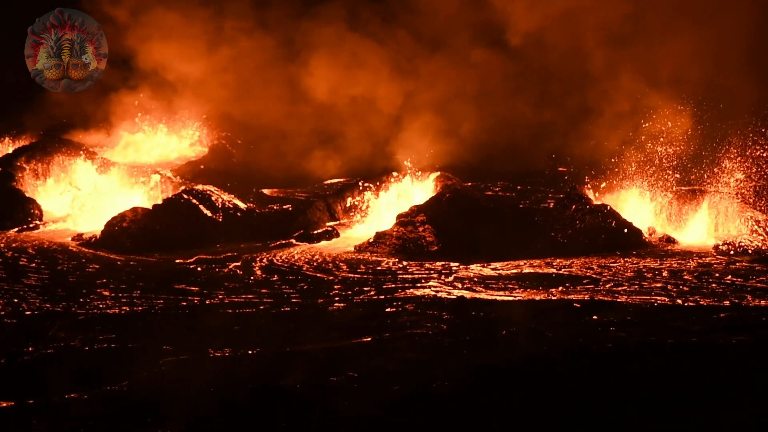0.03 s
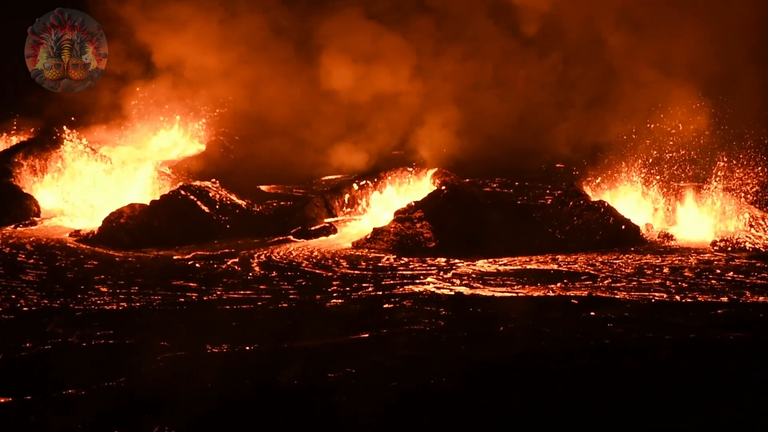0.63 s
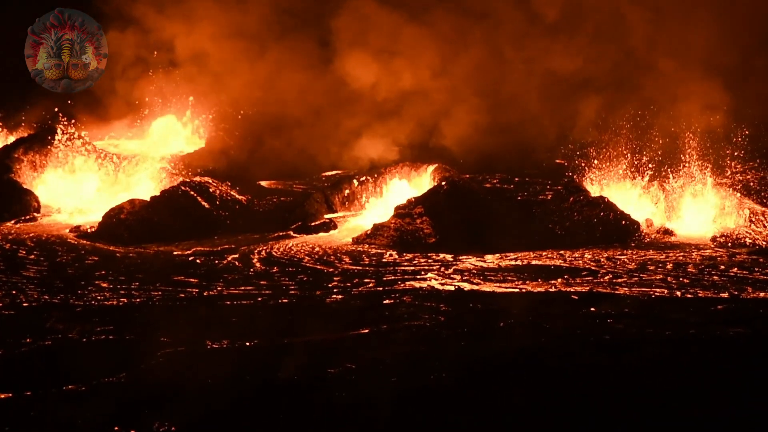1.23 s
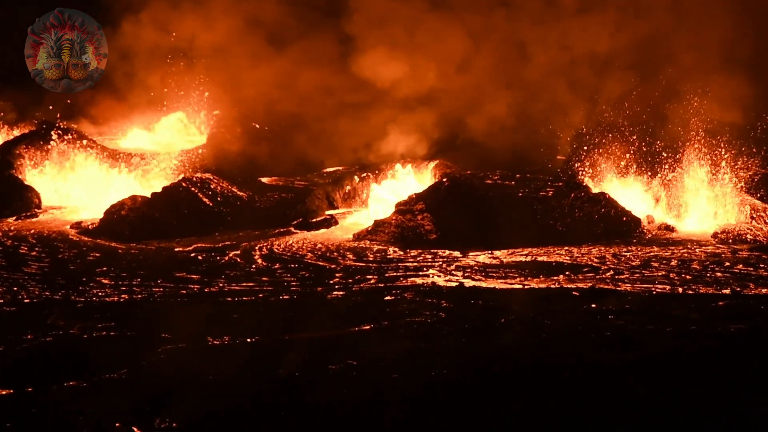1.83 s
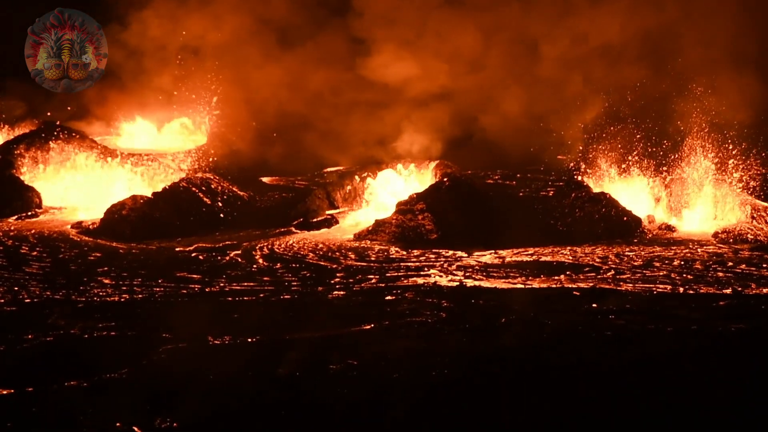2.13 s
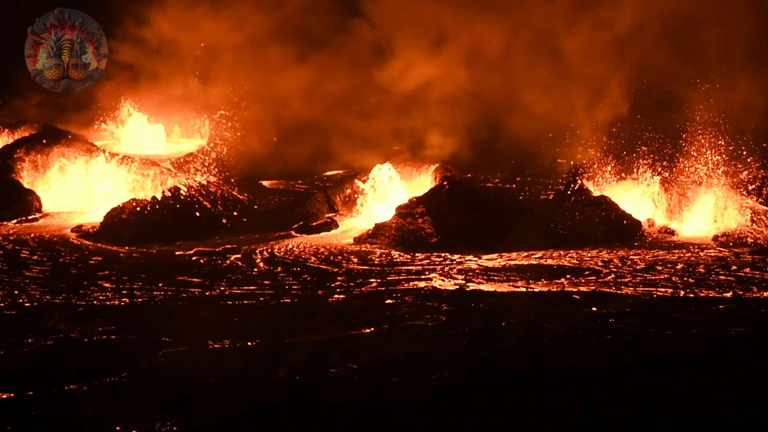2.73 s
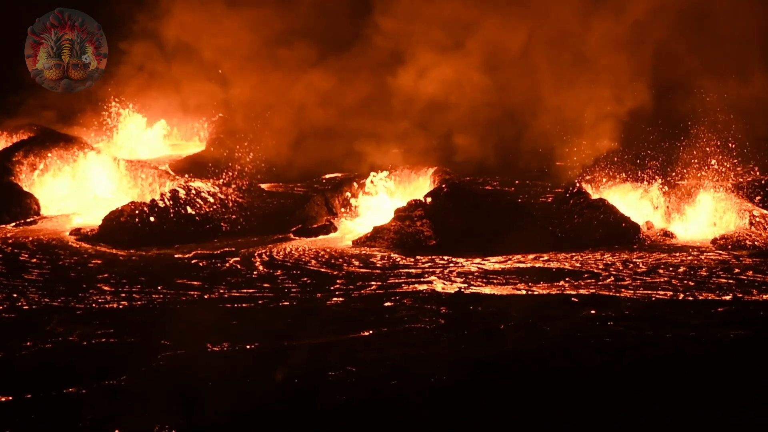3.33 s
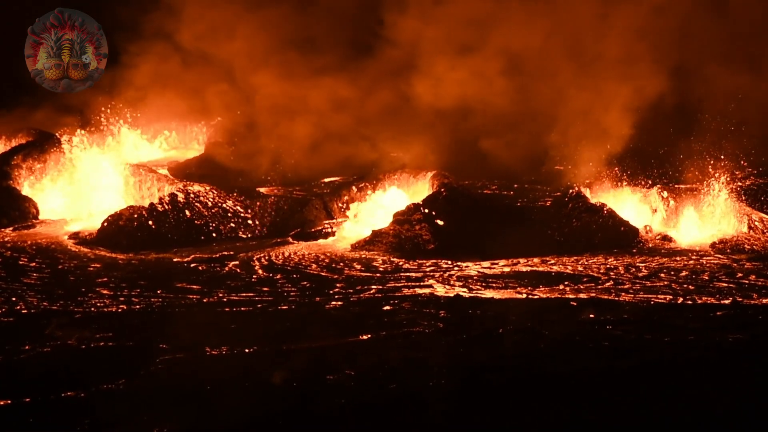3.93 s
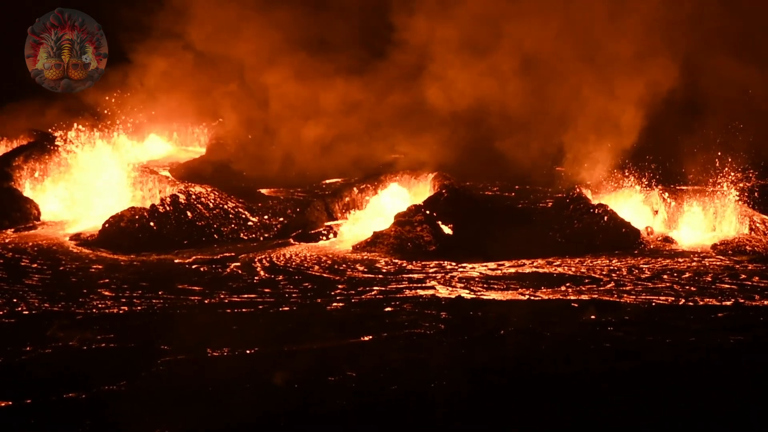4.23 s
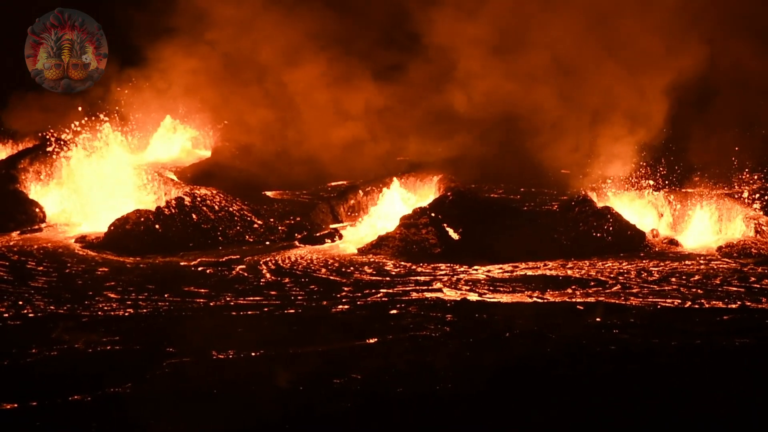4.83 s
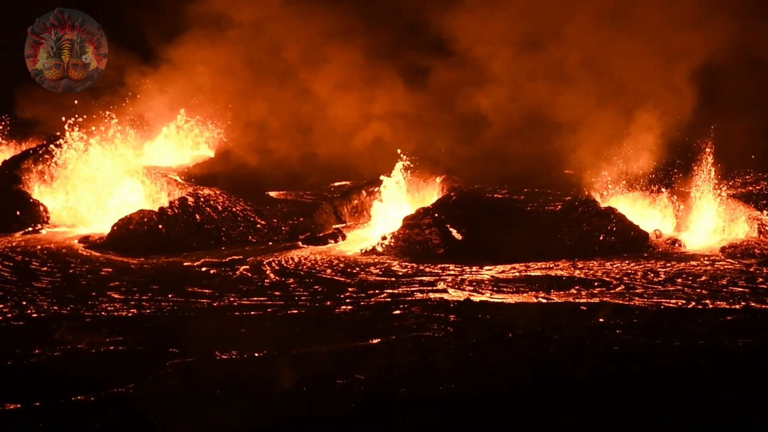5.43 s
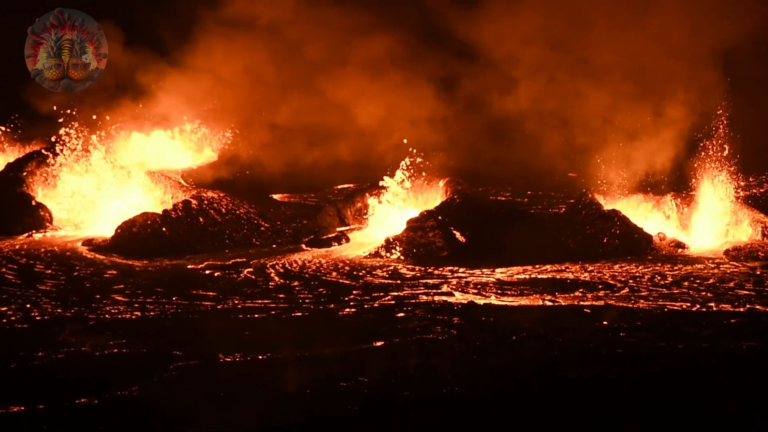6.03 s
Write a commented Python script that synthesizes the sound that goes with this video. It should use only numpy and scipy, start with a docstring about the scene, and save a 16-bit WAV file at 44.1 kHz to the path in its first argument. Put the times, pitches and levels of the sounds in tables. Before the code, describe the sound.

Three lava fountains roar far across an open lava lake for about six seconds. A deep rumble from the vents and light wind runs throughout, with molten rock churning and slapping back into the pools. Above it, gas rushes out in uneven surges, strongest around 1 to 1.6 seconds and again near 2.7 and 3.8, throwing spray that patters and fizzes faintly. Big bubbles give short, low booms, most clearly at the very start and near 1, 2.6 and 3.8 seconds, with weaker ones between and at 4.4. From about 0.5 to 1 second, one vent gives a thin, sharp hiss that cuts off. Short puffs of gas are scattered through, with deeper ones near 1.7, 5 and 5.8 seconds. A single faint dry tick comes just before 6 seconds while the rumble carries on.

```python
"""Three lava fountains roar far across a lava lake at night, in light wind.
Gas rushes out in surges and throws spray that patters on the crust. Big bubbles boom in the
vents over a deep rumble while molten rock churns and slaps back. Single mouths puff, one vent
hisses sharply for half a second, and a dry crackle comes near the end."""
import sys
import numpy as np
from scipy import signal
from scipy.fft import rfft, irfft, next_fast_len
from scipy.io import wavfile
from scipy.ndimage import uniform_filter1d, map_coordinates

SR = 44100
rng = np.random.default_rng(int(sys.argv[2]) if len(sys.argv) > 2 else 0)


def generate_wav(signal):
    """Clip the signal to [-1, 1] and save it as 16-bit WAV at the path in sys.argv[1]."""
    frames = np.transpose(np.atleast_2d(signal))
    scaled = np.clip(frames, -1, 1) * 32767
    pcm = np.round(scaled).astype(np.int16)
    wavfile.write(sys.argv[1], SR, pcm)


N = 272097

# roar, spray and puff spectrum: f/Hz, relative level/dB
ROAR_SPECTRUM = [(150, -3.5), (300, -3), (450, -8.5), (700, -16), (900, -21), (1400, -25), (2000, -29.5),
                 (2700, -36), (3800, -45.5), (5500, -51), (7300, -55.5), (8200, -60), (9200, -71),
                 (14000, -84.5)]
# escaping gas spectrum: f/Hz, relative level/dB
HISS_SPECTRUM = [(2000, 15.5), (3200, 1), (4300, -4), (7100, -8), (8200, -13), (9200, -24), (10700, -23),
                 (12400, -35.5), (16000, -44)]
# steady boil: t/s, rumble/dB, churn/dB, roar/dB, spray/dB, fizz/dB
BOIL_LEVELS = [(0.3, -32, -41.5, -48.5, -60.5, -72.5), (2.0, -30.5, -35.5, -46.5, -58, -72.5),
               (3.3, -30, -36.5, -45.5, -55.5, -72), (4.2, -34, -35, -49, -59.5, -69.5),
               (5.05, -33.5, -34, -48.5, -57, -68.5), (5.7, -29.5, -34, -48.5, -56.5, -68.5),
               (6.15, -26, -45.5, -47.5, -59, -69.5)]


def fountains():
    """Gas roars out in surges and throws pattering spray, whose finest drops fizz."""
    roar_db, spray_db, fizz_db = surge_levels_db()
    gas = turbulence(depth_db=2.0, patch_hz=125.3, patch_s=0.08)
    gas += 0.39 * impacts(rate_per_s=600, spread_db=3.5)
    drops = turbulence(depth_db=1.6, patch_hz=344, patch_s=0.08)
    drops += 0.44 * impacts(rate_per_s=2000, spread_db=5)
    mist = turbulence(depth_db=1.0, patch_hz=384, patch_s=0.076)
    roar = amp(roar_db) * from_vents(gas, ROAR_SPECTRUM, low_hz=324, high_hz=930)
    spray = amp(spray_db) * from_vents(drops, ROAR_SPECTRUM, low_hz=889, high_hz=3400)
    fizz = amp(fizz_db) * from_vents(mist, ROAR_SPECTRUM, low_hz=3150, high_hz=14000)
    return roar + spray + fizz


def surge_levels_db(flutter_db=0.57, flutter_per_s=16):
    """Surges lift roar, spray and fizz above the boil; uneven gas flow flutters all three."""
    # t/s, length/s, attack/s, roar/dB, spray/dB, fizz/dB
    surges = [(-0.03, 0.18, 0.07, -47, -53.5, -74), (0.288, 0.5, 0.59, -42.5, -49, -74),
              (0.676, 0.23, 0.14, -40.5, -48.5, -69), (0.897, 0.25, 0.049, -39, -52.5, -67),
              (1.154, 0.21, 0.081, -37.5, -47.5, -68), (1.366, 0.28, 0.099, -36, -45, -68.5),
              (1.72, 0.11, 0.074, -41.5, -56.5, -70.5), (2.093, 0.48, 0.18, -40, -52.5, -70),
              (2.626, 0.25, 0.068, -39.5, -50, -68.5), (2.91, 0.24, 0.055, -44, -54.5, -70.5),
              (3.395, 0.21, 0.014, -42, -55.5, -67.5), (3.595, 0.32, 0.26, -38.5, -52.7, -69),
              (3.865, 0.15, 0.11, -63, -55.5, -68), (4.208, 0.44, 0.1, -42.5, -58.5, -80),
              (4.603, 0.28, 0.1, -42.5, -52, -70), (4.953, 0.21, 0.027, -43, -56, -76),
              (5.314, 0.087, 0.11, -40.5, -55.5, -69), (5.394, 0.15, 0.035, -50, -59.5, -66.5),
              (5.814, 0.045, 0.052, -41, -62.5, -80), (5.948, 0.25, 0.071, -51.5, -58.5, -74)]
    swells = [swell(*row[:3], release_s=0.07) for row in surges]
    levels_db = power_sum_db(curves(BOIL_LEVELS)[2:], swells, [row[3:] for row in surges])
    flutter = map_coordinates(rng.standard_normal(256), [np.arange(N) / SR * flutter_per_s], mode="wrap")
    return levels_db + flutter_db * flutter


def booms():
    """Each big gas bubble swells and rings for a few cycles, sinking in pitch as it opens."""
    # t/s, relative level/dB, f at peak/Hz, rise/s
    bubbles = [(0.069, -15, 71.8, 0.052), (1.04, -14.5, 69.5, 0.038), (1.311, -21, 65, 0.043),
               (2.361, -19, 59, 0.032), (2.638, -14, 65.3, 0.039), (3.806, -13, 72.3, 0.031),
               (4.381, -19, 57.7, 0.065)]
    out, t = np.zeros(N + SR), np.arange(SR // 2) / SR
    for (start_s, db, hz, rise_s), phase in zip(bubbles, rng.random(len(bubbles))):
        envelope = (t / rise_s * np.exp(1 - t / rise_s)) ** 2
        cycles = np.cumsum(hz * np.exp(-1.2 * (t - rise_s))) / SR
        ring = np.sin(2 * np.pi * (cycles + phase))
        out[round(start_s * SR):][:len(t)] += amp(db - 3.5) * envelope * ring
    return out[:N]


def rumble_and_churn():
    """Vents and wind rumble; heavy clots of lava slap back into the churning pools."""
    # f/Hz, relative level/dB
    bass_spectrum = [(18, -22.5), (25, -9.5), (35, 1.5), (50, -0.5), (68, 3), (90, 1), (150, -6.5),
                     (190, -7.5), (250, -13.5), (400, -19.5), (700, -33)]
    rumble_db, churn_db = heave_levels_db()
    flow = turbulence(depth_db=-1.5, patch_hz=51.0, patch_s=0.25)
    rumble = steadied(from_vents(flow, bass_spectrum, low_hz=22, high_hz=114.6), window_s=0.07)
    slaps = turbulence(depth_db=2, patch_hz=74.5, patch_s=0.055)
    slaps += 0.57 * impacts(rate_per_s=220, spread_db=2.0)
    churn = steadied(from_vents(slaps, bass_spectrum, low_hz=121.2, high_hz=315), window_s=0.13)
    return amp(rumble_db) * rumble + amp(churn_db) * churn


def heave_levels_db():
    """Lava heaves in the vents, lifting rumble and churn above the boil."""
    # t/s, length/s, rumble/dB, churn/dB
    heaves = [(-0.06, 0.22, -27, -39), (0.65, 0.16, -29.5, -32.5), (0.85, 0.57, -28.5, -29.5),
              (1.5, 0.42, -32.5, -40), (2.127, 0.3, -29.5, -31.5), (2.338, 0.49, -28.5, -37.5),
              (2.645, 0.15, -26, -26), (2.86, 0.22, -36.5, -38.5), (3.518, 0.39, -30, -32),
              (3.935, 0.27, -27.5, -35.5), (4.243, 0.23, -25, -31), (4.603, 0.062, -23, -39.5),
              (4.815, 0.047, -28, -41), (4.96, 0.1, -48, -34), (5.136, 0.36, -35.5, -36.5),
              (5.675, 0.17, -28, -34), (6.0, 0.11, -41, -48)]
    swells = [swell(*row[:2], attack_s=0.058, release_s=0.075) for row in heaves]
    return power_sum_db(curves(BOIL_LEVELS)[:2], swells, [row[2:] for row in heaves])


def puffs():
    """A pocket of gas blows through a mouth in the lava, which lends it a broad pitch."""
    # t/s, peak rms level/dB, centre f/Hz, width/Hz, rise/s
    pockets = [(0.05, -55.5, 2090, 1110, 0.063), (0.412, -53.5, 1850, 300, 0.0079),
               (1.5, -42, 666, 248, 0.052), (1.745, -33.5, 350, 110, 0.019), (2.13, -43.5, 760, 220, 0.061),
               (2.95, -38.5, 540, 100, 0.023), (3.44, -47, 1060, 350, 0.063),
               (4.69, -54, 1870, 1100, 0.082), (4.979, -30.5, 220, 110, 0.014),
               (5.4, -59, 2680, 1600, 0.12), (5.837, -28, 165, 90, 0.018)]
    out = np.zeros((2, N))
    for start_s, db, centre_hz, width_hz, rise_s in pockets:
        age = np.maximum(np.arange(N) / SR - start_s, 0) / rise_s
        edge_ratio = np.exp(width_hz / centre_hz / 2)
        noise = rng.standard_normal((2, N))
        rush = from_vents(noise, ROAR_SPECTRUM, centre_hz / edge_ratio, centre_hz * edge_ratio)
        out += amp(db) * (age * np.exp(1 - age)) ** 2 * rush
    return out


def jet(crest_s=0.76, crest_db=-57, slope_db_per_s=28):
    """Gas forced through a narrow crack hisses: it crests, sags and is cut off."""
    hiss_db = crest_db - slope_db_per_s * np.abs(np.arange(N) / SR - crest_s)
    opening = swell(start_s=0.472, length_s=0.495, attack_s=0.08, release_s=0.03)
    gas = turbulence(depth_db=3.0, patch_hz=650, patch_s=0.0393)
    return opening * amp(hiss_db) * from_vents(gas, HISS_SPECTRUM, low_hz=2880, high_hz=14000)


def crackle():
    """A brief dry tick in the treble."""
    # t/s, relative level/dB
    ticks = [(5.951, -56.5)]
    envelope, t = np.zeros(N + SR), np.arange(SR // 10) / SR
    for start_s, db in ticks:
        envelope[round(start_s * SR):][:len(t)] += amp(db - 8) * t / 0.0066 * np.exp(1 - t / 0.0053)
    noise = rng.standard_normal((2, N))
    return envelope[:N] * from_vents(noise, HISS_SPECTRUM, low_hz=6000, high_hz=14200)


def turbulence(depth_db, patch_hz, patch_s):
    """Two noises whose strength drifts in patches of time and frequency."""
    hz, t, spectra = signal.stft(rng.standard_normal((2, N)), SR, nperseg=1024)
    field = rng.standard_normal(spectra.shape[1:])
    grid = np.meshgrid(hz / patch_hz, t / patch_s, indexing="ij")
    patches_db = depth_db * unit(map_coordinates(field, grid, mode="wrap", order=1))
    _, noise = signal.istft(spectra * amp(patches_db), SR, nperseg=1024)
    return unit(noise[:, :N])


def impacts(rate_per_s, spread_db):
    """Two streams of blows at random moments, most small, a few large."""
    hits = rng.random(N) < rate_per_s / SR
    return unit(hits * amp(spread_db * rng.standard_normal(N)) * rng.standard_normal((2, N)))


def from_vents(pair, spectrum, low_hz, high_hz, blur_hz=2900):
    """Band of vent noise at two microphone ports: alike in the bass only, left first; mid rms 1."""
    # f/Hz, lead of left port/s
    left_lead = [(100, 0.00016), (250, 0.0001), (450, 0.000061), (800, 0.00017), (1500, 0.00016),
                 (3000, 0.00017), (6000, .00011)]

    def spread(hz):
        angle = np.arccos(1 / (1 + (hz / blur_hz) ** 2)) / 2
        return colour(spectrum, hz) * band(hz, low_hz, high_hz) * np.array([np.cos(angle), np.sin(angle)])

    def arrival(hz):
        lead_s = np.interp(hz, *np.transpose(left_lead))
        return np.exp(1j * np.pi * lead_s * np.array([hz, -hz]))

    mid, side = filtered(pair, spread)
    ports = filtered(np.array([mid + side, mid - side]), arrival)
    return ports / np.sqrt(np.mean(ports.mean(0) ** 2))


def steadied(x, window_s):
    """Even out the chance swells of a deep noise."""
    power = uniform_filter1d(x.mean(0) ** 2, max(int(window_s * SR), 1))
    return x / np.sqrt(np.abs(power) + 0.07)


def swell(start_s, length_s, attack_s, release_s):
    """Sine rise, hold, exponential fall after length_s."""
    age_s = np.arange(N) / SR - start_s
    rise = np.sin(np.pi / 2 * np.clip(age_s / max(attack_s, 1e-3), 0, 1))
    return rise * np.exp(-np.maximum(age_s - length_s, 0) / max(release_s, 1e-3))


def power_sum_db(steady_db, swells, peaks_db):
    """Per layer: steady level plus all swells, summed in power."""
    return 10 * np.log10(amp(steady_db) ** 2 + (amp(peaks_db) ** 2).T @ np.square(swells))


def curves(rows):
    """Per-sample curve of each column after t/s."""
    times_s, *columns = np.transpose(rows)
    return [np.interp(np.arange(N) / SR, times_s, column) for column in columns]


def filtered(x, response):
    """Apply response(hz) by FFT."""
    size = next_fast_len(N + SR // 2)
    hz = np.fft.rfftfreq(size, 1 / SR) + 1e-3
    return irfft(rfft(x, size) * response(hz), size)[..., :N]


def colour(points, hz):
    """Gain through (f/Hz, level/dB) points on a log axis."""
    points_hz, db = np.transpose(points)
    return amp(np.interp(np.log(hz + 1), np.log(points_hz + 1), db))


def band(hz, low_hz, high_hz, order=5):
    """Smooth band-pass gain."""
    return ((1 + (low_hz / hz) ** (2 * order)) * (1 + (hz / high_hz) ** (2 * order))) ** -0.5


def amp(db):
    """Decibels to gain."""
    return 10 ** (np.asarray(db) / 20)


def unit(x):
    """Scale to rms 1."""
    return x / np.sqrt(np.mean(x ** 2) + 1e-20)


def right_port(hz):
    """The camera body shapes the right port: slight treble lift, a notch, a midrange bump."""
    shelf_db = 0.5 * hz ** 2 / (hz ** 2 + 2300 ** 2)
    notch_db = -5.5 / (1 + ((hz - 4650) / 380) ** 2)
    bump_db = 2.0 / (1 + ((hz - 780) / 230) ** 2)
    return amp(shelf_db + notch_db + bump_db)


def scene():
    """All sources at the two ports."""
    return rumble_and_churn() + booms() + fountains() + jet() + puffs() + crackle()


def record(dry):
    """Port colour, faint microphone self-noise, band limit."""
    # both: f/Hz, relative level/dB
    self_noise = [(100, -4), (7000, 4.5), (9200, -5.5), (10500, 1.5), (12400, -3.5), (14000, 2),
                  (16000, -2.5)]
    left_port = [(300, 0), (780, 0.2), (1500, 0.1), (4500, 3.5), (8000, 2.4)]
    hiss_db, top_hz = -73.0, 15750
    left = filtered(dry[0], lambda hz: colour(left_port, hz))
    right = filtered(dry[1], right_port)
    hiss = unit(filtered(rng.standard_normal((2, N)), lambda hz: colour(self_noise, hz)))
    return filtered(np.array([left, right]) + amp(hiss_db) * hiss, lambda hz: hz < top_hz)


dry = scene()
out = record(dry)
generate_wav(out)
```